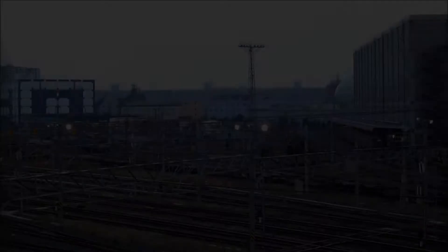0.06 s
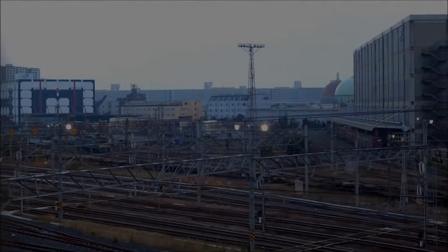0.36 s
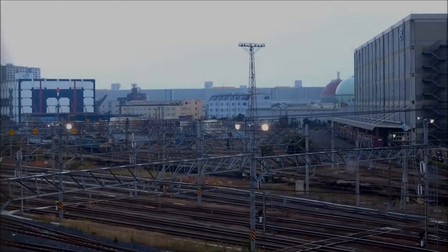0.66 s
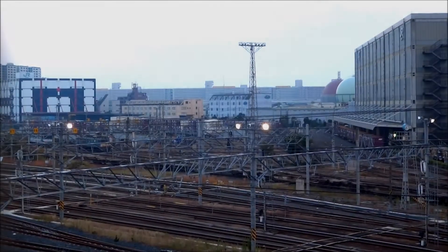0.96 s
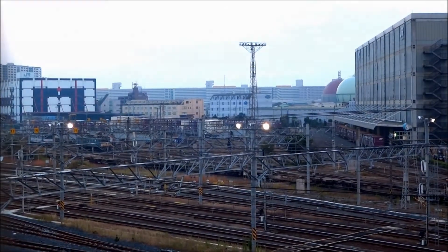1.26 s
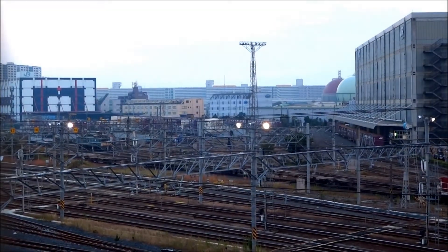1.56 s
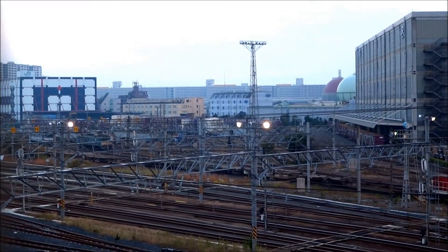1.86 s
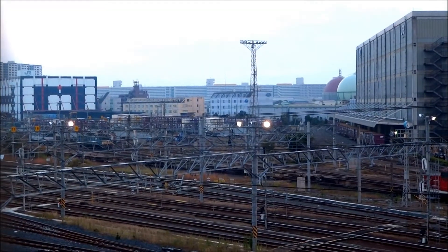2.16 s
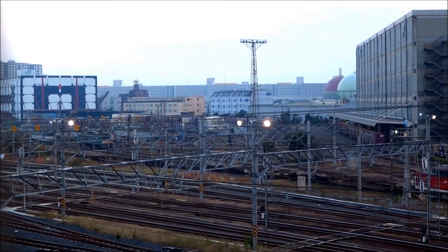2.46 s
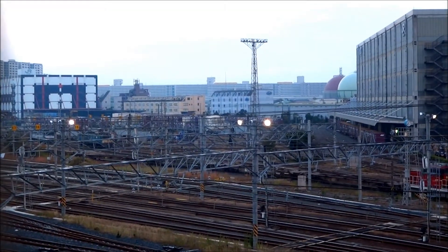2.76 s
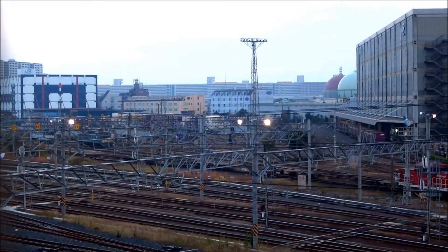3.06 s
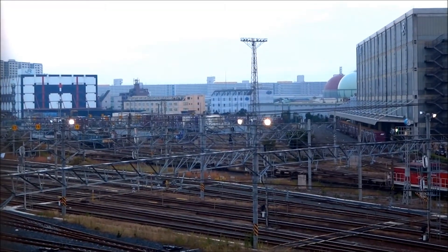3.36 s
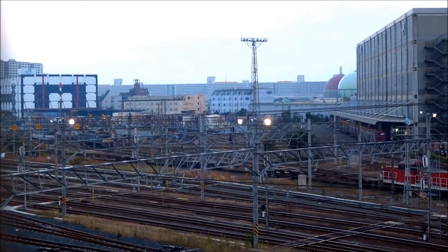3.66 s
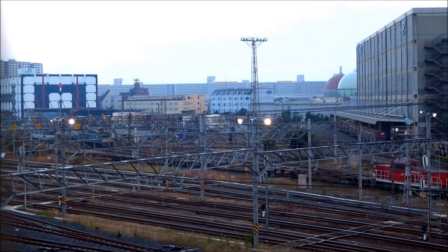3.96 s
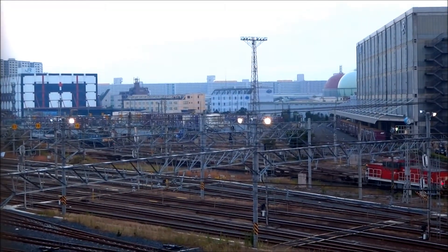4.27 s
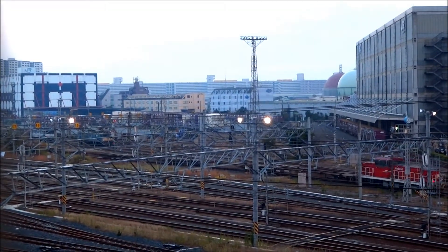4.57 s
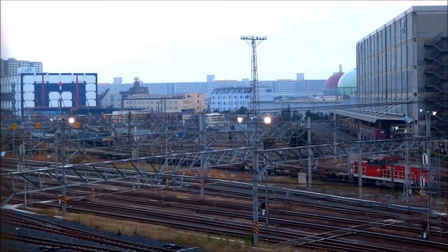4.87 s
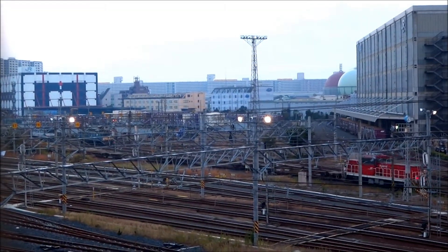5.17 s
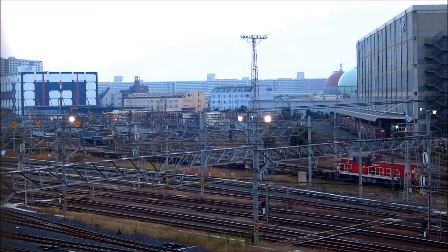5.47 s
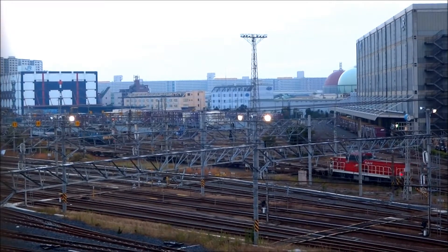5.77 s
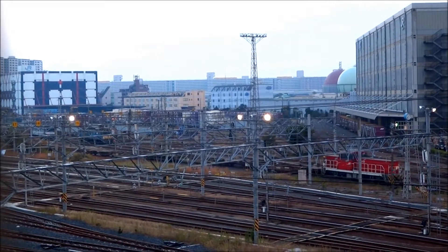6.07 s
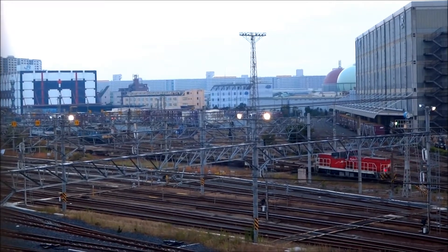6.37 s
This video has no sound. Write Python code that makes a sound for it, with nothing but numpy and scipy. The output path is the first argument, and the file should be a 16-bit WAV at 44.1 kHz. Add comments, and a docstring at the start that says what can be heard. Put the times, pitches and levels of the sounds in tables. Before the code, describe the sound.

Thin, high train wheel squeals and rolling rumble in a rail yard, interrupted by a long, loud hiss of released air.

```python
"""Rail yard from above. Short silence, then wagons fade in, rolling over a curve.
Flanges grind on the rail and ring the wheel discs; single modes lock into groans and thin squeals.
At 2 s the wagons roll away and a long blast of compressed air starts; gain control ducks the rest.
At 4.2 s the valve shuts and the pipe drains with a softer hiss.
At 5.5 s a diesel shunter enters the curve, grinding and squealing."""
import sys
import numpy as np
from scipy import signal
from scipy.fft import rfft, irfft, next_fast_len
from scipy.io import wavfile
from scipy.ndimage import uniform_filter1d, map_coordinates

SR = 44100
rng = np.random.default_rng(int(sys.argv[2]) if len(sys.argv) > 2 else 0)


def waveform_to_disk(signal):
    """Save audio, clipped to [-1, 1], as 16-bit WAV at the path in sys.argv[1]."""
    frames = np.transpose(np.atleast_2d(signal))
    scaled = np.clip(frames, -1, 1) * 32767
    samples = np.round(scaled).astype(np.int16)
    wavfile.write(sys.argv[1], SR, samples)


N = 287292

# Compressed-air noise spectra: f/Hz, level/dB
JET_SPECTRUM = [(250, -33), (330, -23.5), (480, -21), (700, -13.5), (1050, -8.5), (1450, -8.5), (1900, -3),
                (2150, -3), (2450, 0), (3400, -1), (4200, -2.5), (5200, -3), (6000, -4)]
JET_BODY_SPECTRUM = [(500, -11), (1000, -0.5), (1900, -2)]
FIZZ_SPECTRUM = [(4500, -19), (6000, -4), (6600, 0), (8500, 2.5), (10800, 1.5), (12200, -2), (13200, -7),
                 (15500, -10.5)]
DRAIN_SPECTRUM = [(400, -12), (850, -3.5), (1250, -8), (2100, 1), (3400, 0.5), (4000, -7.5), (5200, -10),
                  (6500, -14), (7300, -7), (8000, -15.5), (9700, -7.5), (11500, -22), (13800, -33),
                  (15500, -39)]
# Rolling noise spectra: f/Hz, level/dB
RUMBLE_SPECTRUM = [(20, -26), (40, -9), (65, -1), (110, 3.5), (180, 1), (260, 2), (500, -49)]
ROAR_SPECTRUM = [(150, -13), (200, -6.5), (310, 1.5), (400, -1), (470, -0.5), (560, -4.5), (700, 0),
                 (800, 1.5), (1000, -5.5), (1130, -0.5), (1300, -11), (1800, -13.5)]
SCRAPE_SPECTRUM = [(700, -16), (1400, -1.5), (1700, -3.5), (2500, 2), (3300, 1.5), (4600, 0), (5700, -2),
                   (6700, -6.5), (7800, -7.5), (9500, -9.5), (11500, -17), (13000, -20), (15500, -30)]
GEAR_SPECTRUM = [(120, -12.5), (220, -0.5), (330, 1.5), (500, 1), (800, -7), (1500, -7.5)]
GRIND_SPECTRUM = [(250, -18), (500, -5.5), (700, 2), (1250, 0.5), (1750, 2), (2300, -5), (3400, -6),
                  (4600, -9), (6000, -14), (8000, -18.5), (10000, -20.5), (12000, -30), (15500, -28)]
# Wheel disc modes: f/Hz, width/Hz, wagon level/dB, shunter level/dB
DISC_MODES = [(2005, 25, -15, -4), (2975, 60, -4.5, 1.5), (3400, 110, -13, -7), (4030, 60, -13, 5),
              (4290, 80, -16, -20), (5110, 80, -2, -4), (6170, 70, 0, -1.5), (7250, 130, -15, -12),
              (8280, 120, -15, -13), (9290, 70, -16, -20), (10275, 70, -20, -21), (11230, 110, -26, -23),
              (12600, 150, -28, -27)]
# Flange rubs on the rail: t/s, length/s, level/dB
WAGON_FLANGE_RUBS = [(.43, 0.26, -26), (.94, 0.47, -16), (1.8, 0.1, -27)]
SHUNTER_FLANGE_RUBS = [(5.6, .25, -34), (5.86, .15, -18), (6.11, .08, -26.5), (6.33, .16, -30.5)]
# Locked high modes: t/s, length/s, f/Hz, waver/Hz, level/dB
WHEEL_SQUEALS = [ (.98, .12, 6150, 7, -17), (1.0, .55, 5087, 9, -22.5), (1.04, .42, 6149, 6, -18.5),
                 (1.11, .09, 2968, 7, -15.5), (1.15, .16, 5125, 18, -20), (1.2, .44, 6198, 7, -21),
                 (1.37, .16, 4015, 8, -22.5), (1.3, .32, 2005, 7, -25), (1.5, .5, 5095, 25, -32),
                 (1.52, .6, 4037, 16, -30), (1.55, .6, 2015, 12, -31.5), (1.81, .12, 2985, 14, -22.5),
                 (4.6, .7, 9006, 4, -42), (5.1, .08, 13230, 55, -41), (5.15, .9, 7560, 40, -36),
                 (5.2, .4, 9004, 4, -37), (5.33, .28, 3537, 5, -29), (5.58, .37, 9003, 3, -35),
                 (5.64, .175, 1621, 4, -13.5), (5.777, .05, 1619, 2, -5.5), (5.76, .86, 9001, 2, -29.5),
                 (5.78, .2, 1618, 4, -16.5), (5.9, .14, 2008, 6, -28), (5.85, .22, 2990, 20, -23),
                 (5.9, .16, 4050, 20, -24), (6.13, .08, 3545, 8, -28)]
# Locked low modes: t/s, length/s, f/Hz, level/dB
WHEEL_GROANS = [(.43, .3, 396, -28), (.48, .22, 236, -24.5), (.61, .29, 370, -16.5), (.87, .14, 363, -16),
                (.98, .11, 356, -22), (.5, .55, 790, -32), (1.5, .25, 294, -25), (1.55, .5, 236, -33),
                (1.6, .1, 692, -21.5), (1.6, .55, 325, -27), (2.98, .13, 335, -27), (3.19, .1, 330, -31),
                (5.2, .36, 870, -32), (5.55, .56, 725, -25)]
# Running-gear knocks: t/s, level/dB
GEAR_KNOCKS = [(1.6, -24), (1.86, -26), (2.38, -31), (3.02, -28), (3.55, -31), (4.33, -32.5)]
# Yard reverberation: f/Hz, T60/s
YARD_DECAY = [(200, 0.29), (2000, 1), (10000, 0.54)]
# Background hiss spectrum: f/Hz, level/dB
HISS_SPECTRUM = [(3000, 6), (7000, -6), (12000, -3), (15500, -9)]
# Left-right likeness: f/Hz, coherence/1
STEREO_COHERENCE = [(60, .996), (125, .988), (250, .965), (550, .93), (1650, .91), (8000, .89),
                    (15000, .94)]

BITE_S, WAGONS_LEAVE_S, WAGONS_T60_S = 0.99, 2.02, 1.45
VALVE_OPEN_S, VALVE_SHUT_S = 1.999, 4.221
CURVE_S, CURVE_ENTRY_S = 5.49, 0.21


def air_blast(jet_db_per_s=3.5, fizz_db_per_s=5):
    """Open valve: a turbulent jet and its fizz swell over a steady, dull body."""
    open_s = since(VALVE_OPEN_S)
    jet = amp(-8.5 + jet_db_per_s * open_s) * rush(JET_SPECTRUM, patchy_db=1)
    jet += amp(-18.5) * rush(JET_BODY_SPECTRUM, patchy_db=0.6)
    jet += whistle()
    fizz = amp(-13.5 + fizz_db_per_s * open_s) * rush(FIZZ_SPECTRUM, patchy_db=0.5)
    flow = ramp(VALVE_OPEN_S, 0.18) * amp(0.5 * wobble(29.42))
    return flow * (jet * decay(VALVE_SHUT_S, t60_s=0.87) + fizz * decay(VALVE_SHUT_S, t60_s=0.65))


def whistle(start_s=2.6, length_s=1.3, start_hz=3823, width_hz=290, sink_oct_per_s=0.63):
    """Turbulence rings a broad resonance; its pitch sinks as the air escapes."""
    hz = start_hz * 2 ** (-sink_oct_per_s * since(start_s))
    inphase, quadrature = filtered(rng.standard_normal((2, N)), lambda f: 1 / (1 + (f / width_hz) ** 2))
    phase = 2 * np.pi * np.cumsum(hz) / SR
    band = unit_rms(inphase * np.cos(phase) + quadrature * np.sin(phase))
    return amp(-12.5) * swell(start_s, length_s) * band


def pipe_drain(sag_db_per_s=7.5):
    """Valve shut: the pipe empties with a duller hiss."""
    pressure = amp(-17 - sag_db_per_s * since(VALVE_SHUT_S))
    pressure *= burst(VALVE_SHUT_S, attack_s=0.12, hold_s=1.38, t60_s=3.2)
    return pressure * rush(DRAIN_SPECTRUM, patchy_db=1.1)


def wagons(ease_db=2.5, scrape_ease_db=1.5):
    """Heavy wheels rumble, roar and scrape on the rail, ease after a flange bites, then roll away."""
    eased = ramp(BITE_S, 0.087)
    rumble = amp(-33 - ease_db * eased) * rush(RUMBLE_SPECTRUM, patchy_db=2)
    roar = amp(-19.5 - ease_db * eased + 0.14 * wobble(7.26)) * rush(ROAR_SPECTRUM, patchy_db=0.5)
    bite = amp(-22) * burst(BITE_S, attack_s=0.02, hold_s=0.029, t60_s=0.26)
    friction = amp(-20 - scrape_ease_db * eased + 0.82 * wobble(24))
    scrape = (friction + bite) * rush(SCRAPE_SPECTRUM, patchy_db=2)
    return (rumble + roar + scrape) * decay(WAGONS_LEAVE_S, WAGONS_T60_S)


def shunter(approach_db_per_s=0.3, rumble_lead_s=0.3):
    """The locomotive rumbles nearer; running gear and wheels grind harder in the curve."""
    in_curve = ramp(CURVE_S, CURVE_ENTRY_S)
    rumble_rise = ramp(CURVE_S - rumble_lead_s, CURVE_ENTRY_S)
    rumble = amp(-44.5 + 1.5 * rumble_rise) * rush(RUMBLE_SPECTRUM, patchy_db=1.5)
    gear = amp(-35 + 4 * in_curve) * rush(GEAR_SPECTRUM, patchy_db=1.5)
    grind = amp(-28.5 + 9 * in_curve + 0.5 * wobble(22)) * rush(GRIND_SPECTRUM, patchy_db=-0.9)
    return (rumble + gear + grind) * amp(approach_db_per_s * since(CURVE_S))


def flange(rubs, mode_db, t60_s, chatter_db):
    """Each flange rub drives all disc modes, with stick-slip chatter."""
    def disc_gain(hz):
        return np.sqrt(sum(amp(db) ** 2 / width_hz / (1 + ((hz - mode_hz) / width_hz) ** 2) ** 2
                           for (mode_hz, width_hz, *_), db in zip(DISC_MODES, mode_db)))

    pressure = sum(amp(db) * burst(start_s, 0.11, length_s, t60_s) for start_s, length_s, db in rubs)
    return pressure * amp(chatter_db * wobble(35)) * stereo_noise(disc_gain, patchy_db=1.5)


def locked_mode(hz, waver_hz, slip_per_s=170, flutter_db=1.2):
    """One wheel mode sings; uneven slip shakes its pitch and level."""
    phase = 2 * np.pi * np.cumsum(hz + waver_hz * wobble(slip_per_s)) / SR
    return amp(flutter_db * wobble(45)) * np.sin(phase)


def squeals():
    """High wheel modes swell and fade, each around one pitch."""
    return sum(amp(db) * swell(start_s, length_s) * locked_mode(hz, waver_hz)
               for start_s, length_s, hz, waver_hz, db in WHEEL_SQUEALS)


def groans(sag_per_s=0.1, waver_share=0.006):
    """Low wheel modes swell and fade, sinking in pitch."""
    total = np.zeros(N)
    for start_s, length_s, hz, db in WHEEL_GROANS:
        sinking_hz = hz * (1 - sag_per_s * since(start_s + length_s / 2))
        total += amp(db) * swell(start_s, length_s) * locked_mode(sinking_hz, waver_share * hz)
    return total


def screech(hz=7200, waver_hz=42):
    """One wheel holds a thin, rough tone plus octave; both leave with the wagons."""
    fundamental = amp(-27.5) * locked_mode(hz, waver_hz)
    octave = amp(-46) * locked_mode(2 * hz, waver_hz)
    return (fundamental + octave) * decay(WAGONS_LEAVE_S, WAGONS_T60_S)


def knocks():
    """Dull knocks briefly stir the running gear."""
    strength = sum(amp(db) * burst(start_s, attack_s=0.04, hold_s=0.037, t60_s=1)
                   for start_s, db in GEAR_KNOCKS)
    return strength * rush(GEAR_SPECTRUM, patchy_db=0.5)


def yard_echo(x):
    """Sheds and wagon sides scatter the sound; the mids ring longest."""
    hz, time_s, bins = signal.stft(rng.standard_normal((2, SR // 2)), SR, nperseg=256)
    t60_s = log_interp(YARD_DECAY, hz)[:, None]
    tail = signal.istft(bins * amp(-60 * time_s / t60_s), SR, nperseg=256)[1]
    return signal.fftconvolve(x[None], tail / np.linalg.norm(tail[0]), axes=1)[:, :N]


def background_hiss():
    """Faint, steady hiss."""
    return amp(-36) * rush(HISS_SPECTRUM, patchy_db=-1)


def rush(spectrum, patchy_db):
    """Broadband noise, rolled off steeply past the spectrum's ends."""
    def gain(hz):
        rolloff = np.minimum(hz / spectrum[0][0], 1) ** 2 / np.maximum(hz / spectrum[-1][0], 1) ** 4
        return amp(log_interp(spectrum, hz)) * rolloff

    return stereo_noise(gain, patchy_db)


def stereo_noise(gain, patchy_db):
    """Near-mono noise, rms 1, shaped by gain(hz), with drifting patches of turbulence."""
    def mid_side_gain(hz):
        angle = np.arccos(np.clip(log_interp(STEREO_COHERENCE, hz), -1, 1)) / 2
        return gain(hz) * np.array([np.cos(angle), np.sin(angle)])

    bins = signal.stft(rng.standard_normal((2, N)), nperseg=512)[2]
    patches = uniform_filter1d(rng.standard_normal(bins.shape[1:]), size=9, axis=0)
    patches = unit_rms(uniform_filter1d(patches, size=14, axis=1))
    pair = signal.istft(bins * amp(patchy_db * patches), nperseg=512)[1][:, :N]
    mid, side = filtered(pair, mid_side_gain)
    return unit_rms(np.array([mid + side, mid - side]))


def filtered(x, gain):
    """Zero-phase filter by gain(hz)."""
    size = next_fast_len(N + SR // 4)
    return irfft(rfft(x, size) * gain(np.fft.rfftfreq(size, 1 / SR)), size)[..., :N]


def panned(x, left_db):
    """Pan by level difference."""
    return x * amp([[left_db / 2], [-left_db / 2]])


def burst(start_s, attack_s, hold_s, t60_s):
    """Rise; decay from hold_s after the start."""
    return ramp(start_s, attack_s) * decay(start_s + hold_s, t60_s)


def swell(start_s, length_s):
    """Symmetric rise and fall."""
    edge_s = 0.38 * length_s
    return ramp(start_s, edge_s) * (1 - ramp(start_s + length_s - edge_s, edge_s))


def ramp(start_s, length_s):
    """Smooth step, 0 to 1."""
    return np.sin(np.pi / 2 * np.clip(since(start_s) / length_s, 0, 1)) ** 2


def decay(start_s, t60_s):
    """Unity, then exponential decay."""
    return amp(-60 * np.maximum(since(start_s), 0) / t60_s)


def wobble(knots_per_s):
    """Smooth random curve."""
    knots = rng.standard_normal(int(N * knots_per_s / SR) + 4)
    return map_coordinates(knots, [np.arange(N) * knots_per_s / SR])


def since(start_s):
    """Elapsed time/s per sample."""
    return np.arange(N) / SR - start_s


def log_interp(points, hz):
    """Interpolate (f/Hz, value) points over log frequency."""
    point_hz, values = np.transpose(points)
    return np.interp(np.log(hz + 1), np.log(point_hz + 1), values)


def amp(db):
    """dB to gain."""
    return 10 ** (np.asarray(db) / 20)


def unit_rms(x):
    """Scale to rms 1."""
    return x / np.sqrt(np.mean(x ** 2) + 1e-20)


def scene():
    """Ringing wheels, rolling stock and compressed air over a faint hiss."""
    _, _, wagon_db, shunter_db = np.transpose(DISC_MODES)
    tones = squeals() + groans() + screech()
    wagon_ring = flange(WAGON_FLANGE_RUBS, wagon_db, t60_s=1.25, chatter_db=-0.5)
    shunter_ring = flange(SHUNTER_FLANGE_RUBS, shunter_db, t60_s=0.7, chatter_db=2.5)
    hiss = background_hiss()
    wheels = panned(wagon_ring, left_db=-1) + shunter_ring + tones + amp(-13) * yard_echo(tones)
    rolling = wagons() + shunter() + knocks()
    air = panned(air_blast(), left_db=1.35) + panned(pipe_drain(), left_db=1.2)
    return air + rolling + wheels + hiss


def record(dry, ceiling_db=-12, window_s=0.084, top_hz=15950, silence_s=0.43, fade_s=0.085):
    """Gain control to an rms ceiling, soft clip, low-pass, fade-in."""
    power = np.abs(uniform_filter1d(np.mean(dry ** 2, axis=0), int(window_s * SR)))
    held = dry / np.maximum(np.sqrt(power) / amp(ceiling_db), 1)
    rounded = held / (1 + np.abs(held) ** 8) ** (1 / 8)
    lowpass = lambda hz: np.sin(np.pi / 2 * np.clip((top_hz - hz) / 200, 0, 1)) ** 2
    fade = np.clip(since(silence_s) / fade_s, 0, 1)
    return fade * filtered(rounded, lowpass)


dry = scene()
out = record(dry)
waveform_to_disk(out)
```